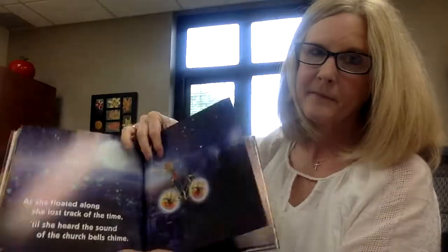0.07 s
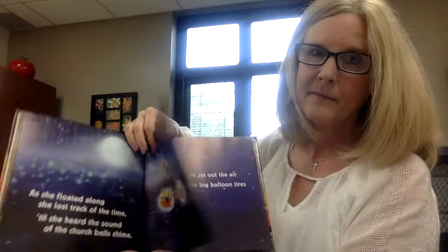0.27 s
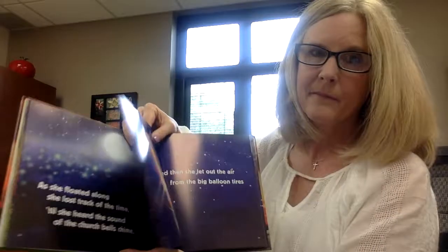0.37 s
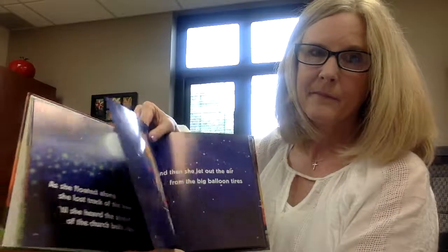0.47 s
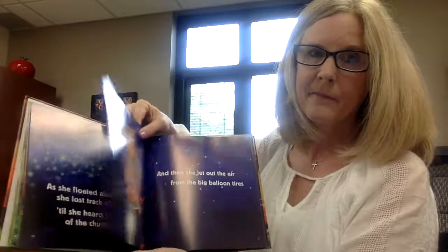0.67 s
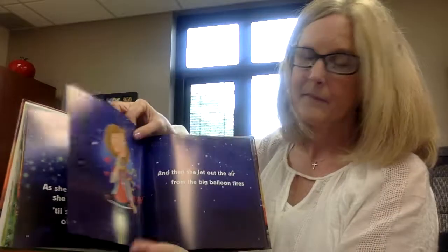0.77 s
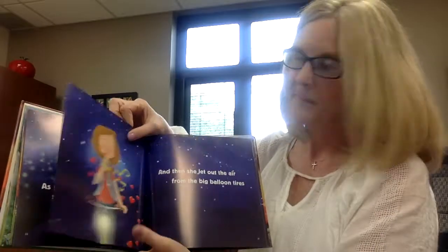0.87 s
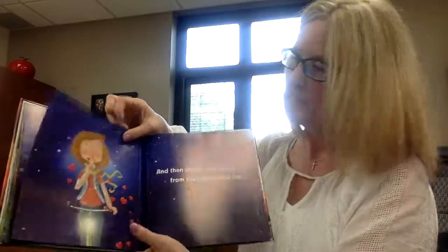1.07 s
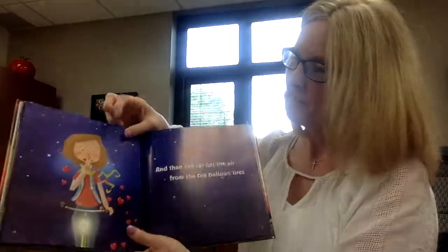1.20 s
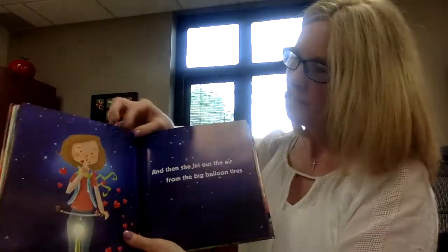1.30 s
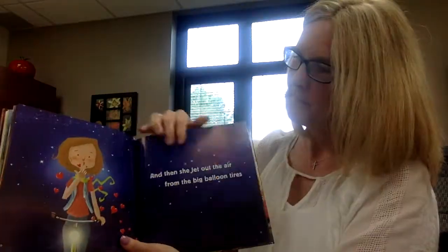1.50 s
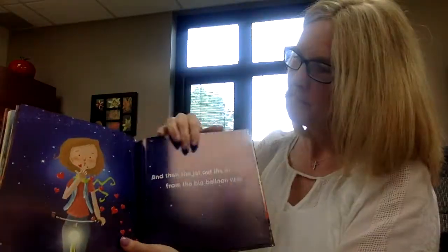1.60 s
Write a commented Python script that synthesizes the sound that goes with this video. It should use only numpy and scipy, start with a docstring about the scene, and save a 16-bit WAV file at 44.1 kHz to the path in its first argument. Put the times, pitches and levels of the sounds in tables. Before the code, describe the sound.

A large paper page rustles, slides over and snaps flat, close by in a quiet room.

```python
"""A papery rustle swells into a swish, then come a few crisp snaps and some faint, high brushing.
It is a large, stiff picture-book page being turned by hand, close by, in a quiet room.
Fingers pick up the corner, and the sheet slides over its neighbour, buckles and snaps flat;
then fingertips brush the glossy paper. The rubbing sounds are many tiny slips, filtered;
each snap is a few tones that die away at once. The book rings faintly and the room echoes."""
import sys
import numpy as np
from scipy import signal
from scipy.fft import rfft, irfft
from scipy.io import wavfile

SR = 44100
rng = np.random.default_rng(int(sys.argv[2]) if len(sys.argv) > 2 else 0)


def persist_wave(psi):
    """Save psi, clipped to +-1, as 16-bit WAV."""
    counts = np.round(np.clip(psi, -1, 1) * 32767).astype(np.int16)
    wavfile.write(sys.argv[1], SR, np.atleast_2d(counts).T)


N = 72765

# Below, low_hz and top_hz bound a sound's band, and hollow_hz is a dip in its tone.
# Fizz is the very high sizzle. fade_db is the level change along a stroke (plus means louder).
# Short rubs of paper on paper:
# start_s, length_s, level_db, low_hz, top_hz, hollow_hz, relative_fizz_db, fade_db
RUBS = [(-.01, 0.026, -59.5, 2900, 6660, 2850, -13.5, 1), (0.026, .05, -70.5, 910, 4540, 2800, -19, 1),
        (0.084, 0.015, -60, 1490, 4400, 2580, -24, 4), (0.128, 0.031, -47, 2540, 5900, 5050, -20, -5),
        (0.164, 0.044, -62, 2950, 5150, 4900, -20, 8), (0.194, 0.07, -46.5, 1940, 6060, 2850, -13.5, -1),
        (.26, 0.037, -54.5, 1760, 5100, 2800, -27, 0.5), (0.831, 0.051, -56, 2160, 3960, 3000, -7, -2),
        (0.879, 0.031, -51.5, 1130, 3900, 1760, -30, -6.5), (0.976, 0.033, -51, 1000, 2220, 3570, -26, -2),
        (1.017, 0.053, -47.5, 1510, 2975, 3380, -15.5, -0.5),
        (1.031, 0.034, -54.5, 4200, 6230, 3420, -6, -6.5),
        (1.069, 0.056, -54.5, 1260, 2800, 3400, -13.5, 0.5),
        (1.108, 0.034, -54.5, 1100, 5830, 3700, -9.5, 1),
        (1.152, 0.028, -66.5, 1040, 3120, 3960, -25, 20.5),
        (1.164, 0.0064, -46.5, 1200, 3680, 2720, 1, -11), (1.197, 0.0058, -53.5, 1470, 2290, 3700, 0.5, -2),
        (1.249, 0.066, -72, 1610, 5640, 3760, -10, 7)]
# Creases snapping: time_s, level_db, low_hz, top_hz, decay_s, relative_fizz_db
SNAPS = [(0.0836, -33, 2720, 4600, 0.0002, -2), (0.5463, -25, 780, 5900, 0.00017, -28),
         (.9212, -34.5, 497, 2760, 0.0023, -55), (0.9604, -19.5, 920, 3130, 0.00096, -53.5),
         (0.9676, -43, 910, 2200, 0.00035, -29), (1.1036, -25, 1300, 4670, 0.0027, -11),
         (1.1078, -17.5, 1750, 6800, .0006, -6.5), (1.1445, -30.5, 751, 3740, 0.00026, -14),
         (1.145, -34, 1100, 3360, 0.00043, -28), (1.1819, -38.5, 1310, 3100, 0.00027, -3),
         (1.198, -31.5, 1400, 3340, 0.0011, -5.5), (1.317, -50, 1530, 4000, 0.0015, -2.5)]
# The tones a snap rings with: pitch_hz, level_db
SNAP_TONES = [(950, -0.5), (1850, 3.5), (2700, -0.5), (3850, -2.5), (4750, -2.5), (6900, -9)]
# Dull flaps as the sheet buckles: start_s, length_s, level_db, top_hz, fade_db
FLAPS = [(0.1, 0.052, -62, 1190, 2), (.914, 0.046, -53.5, 1440, 8.5), (0.946, 0.017, -46, 2570, 6.5),
         (0.964, .02, -52, 2210, -1)]
# The page landing softly on the book: start_s, level_db, pitch_hz, decay_s
THUMPS = [(.109, -55.5, 480, 0.016), (0.918, -60, 267, 0.013), (0.96, -62, 276, 0.02),
          (1.108, -51.5, 303, 0.01)]
# The long slide, one list for each of its two pulls: time_s, level_db
SLIDE_PULLS = [
    [(0.29, -54.5), (0.312, -58.5), (0.322, -49), (0.406, -43.5), (0.476, -44.5), (0.495, -55.5)],
    [(0.5, -50), (0.51, -41), (0.578, -41), (0.61, -33.5), (0.68, -33.5), (0.702, -42.5), (0.83, -70.5)],
]
# The slide's tone as the sheet bends: time_s, low_hz, top_hz, hollow_hz, relative_fizz_db
SLIDE_BEND = [(.30, 1720, 5100, 5160, -27), (.35, 1360, 6100, 4800, -27), (.41, 926, 5970, 5300, -38),
              (0.488, 1020, 4770, 4900, -22), (.52, 990, 5540, 4840, -68), (0.549, 735, 6060, 4760, -29),
              (0.603, 864, 6240, 4950, -36), (.63, 1080, 6800, 4770, -24), (0.65, 1130, 6700, 8400, -28),
              (0.678, 1010, 6200, 7460, -18), (0.711, 1120, 5160, 7000, -30),
              (0.758, 1250, 4490, 5700, -42), (.83, 1740, 4600, 5200, -23)]
# The edge catching and chattering: middle_s, half_length_s, level_db, pitch_hz
CATCHES = [(0.603, 0.0016, -20.5, 2600), (0.615, 0.0028, -25.5, 2437), (0.6305, 0.0014, -25, 2550),
           (0.903, .004, -47, 2270)]
# Fingertips brushing the gloss: start_s, length_s, fizz_db, hiss_db, fade_db
BRUSHES = [(0.828, 0.055, -62.5, -70, -17), (1.356, 0.02, -47.5, -103, -27), (1.418, 0.04, -57, -94, -9.5),
           (1.515, 0.024, -58.5, -57, -1), (1.544, 0.042, -62.5, -62, -6.5),
           (1.615, 0.035, -59.5, -100, -10)]
# The edge scraping just before the page tips over: start_s, length_s, level_db, pitch_hz
SCRAPES = [(0.836, 0.039, -57.5, 2550), (0.875, 0.083, -59, 2330)]
# Tone colours, or how strong each sound is from bass to treble: frequency_hz, gain_db
AIR_COLOUR = [(25, -34), (50, -23.5), (80, -8.5), (130, -2), (200, -7), (320, -6.5), (500, -12.5),
              (1100, -17.5), (1900, -19), (2400, -13.5), (4000, -18), (6000, -16.5), (7500, -23),
              (16000, -17)]
PAPER_COLOUR = [(300, -20.5), (700, -10), (1020, -4), (1400, -9), (1750, -3), (2100, 0.5), (2450, -1),
                (3200, -1), (4000, 0.5), (4900, -8.5), (5900, -3.5), (7500, -16), (10000, -17)]
FIZZ_COLOUR = [(5000, -44), (7500, -27.5), (8600, -3), (9500, -22.5), (10700, -4.5), (12200, 3.5),
               (13300, 5), (14600, 7.5), (15800, -5.5)]
FLAP_COLOUR = [(100, -47), (170, -7), (290, 3), (460, -10.5), (700, -4), (980, 3.5), (1350, -4),
               (1800, 6.5), (2700, 3), (3200, -15), (6000, -7)]
SLIDE_COLOUR = [(300, -19), (740, -3), (1020, -4), (1400, -7.5), (1750, -4.5), (2050, -2), (2450, -1),
                (3200, 1), (4000, -2.5), (4900, -4), (5900, -6.5), (7500, -13), (10000, -10.5)]
FINGER_COLOUR = [(1000, -46.5), (2400, -4.5), (3100, -18), (3800, -2), (4600, -16.5), (5300, 9),
                 (5900, 10.5), (7200, -11), (8300, -10), (10000, -37), (16000, -26.5)]
# Pitches the open book boosts or weakens: pitch_hz, boost_db (capped in book_ring)
BOOK_RESONANCES = [(760, 2), (1035, 3.5), (1233, 1.5), (1502, 7.5), (1640, 8), (1850, 0.5), (2153, 2.5),
                   (2370, -0.5), (2625, 7.5), (2851, -11), (3113, 2.5), (3844, 9.5), (4179, -0.5),
                   (5690, 3.5), (5868, 4)]
# Echoes from the book and desk: delay_s, gain
ECHOES = [(.0017, 0.41), (.0031, -0.23), (.0058, -0.022), (.0084, -0.034)]

LOW_SLOPE, TOP_SLOPE = 2.93, 3.6  # how steeply a band's edges fall (filter order)
RUB_RISE_S, SLOW_RELEASE_S = 0.014, 0.012
SHEET_BASS_LIMIT_HZ = 166  # the sheet gives off little sound below this


def amp(db):
    """Turns decibels into a number to multiply by."""
    return 10 ** (np.asarray(db) / 20)


def unit(x):
    """Scales a sound to an average (rms) level of 1."""
    return x / np.sqrt(np.mean(x ** 2) + 1e-20)


def colour(points, hz):
    """Reads the gain at each frequency from a tone colour table."""
    f, db = np.transpose(points)
    return amp(np.interp(np.log(hz + 1), np.log(f), db))


def below(hz, edge_hz, slope):
    """A gain that keeps what is below the edge; swap the frequencies to keep what is above."""
    return 1 / np.sqrt(1 + ((hz + 1) / (edge_hz + 1)) ** (2 * slope))


def band(hz, low_hz, top_hz, low_slope=LOW_SLOPE, top_slope=TOP_SLOPE):
    """A gain that keeps what lies between two edges."""
    return below(low_hz, hz, low_slope) * below(hz, top_hz, top_slope)


def bell(offset, width):
    """A smooth bump, 1 high where the offset is zero."""
    return np.exp(-(offset / width) ** 2)


def shaped(x, gain):
    """Filters a sound by gain(frequency), then scales it to level 1."""
    return unit(irfft(rfft(x) * gain(np.fft.rfftfreq(len(x), 1 / SR)), len(x)))


def coloured(x, points):
    """Gives a sound a tone colour, at level 1."""
    return shaped(x, lambda f: colour(points, f))


def add(mix, start_s, sound):
    """Mixes a sound in, cutting off whatever does not fit."""
    at = round(start_s * SR)
    sound = sound[max(-at, 0):]
    part = mix[max(at, 0):][:len(sound)]
    part += sound[:len(part)]


def friction(size, slips_per_s=9000, spread_db=2, flutter_db=1.37, clump_s=0.003):
    """Rubbing makes tiny slips of uneven strength, in clumps, over a smooth hiss."""
    slips = (rng.random(size) < slips_per_s / SR) * rng.choice([-1, 1], size)
    strength = amp(spread_db * np.minimum(rng.exponential(1, size), 4))
    clumps = np.interp(np.arange(size) / SR / clump_s, np.arange(size), rng.standard_normal(size))
    hiss = 0.71 * rng.standard_normal(size)
    return unit((unit(slips * strength) + hiss) * amp(flutter_db * clumps))


def stroke(length_s, fade_db, rise_s, release_s):
    """Returns friction and its envelope (loudness over time): a rise, a sloping hold, a dying away."""
    t = np.arange(SR // 4) / SR
    rise = np.minimum(t / rise_s, 1)
    hold = amp(fade_db * np.minimum(t / length_s, 1))
    release = np.exp(-np.maximum(t - length_s, 0) / release_s)
    return friction(len(t)), rise * hold * release


def room_tone(hum_hz=140.6, width_hz=22):
    """A steady hiss and the low drone of ventilation lie under everything."""
    air = coloured(rng.standard_normal(N), AIR_COLOUR)
    hum = shaped(rng.standard_normal(N), lambda f: 1 / (1 + ((f - hum_hz) / width_hz) ** 2))
    return amp(-71) * air + amp(-80.5) * hum


def rub(length_s, db, low_hz, top_hz, hollow_hz, fizz_db, fade_db):
    """Paper drags briefly on paper; the curve of the sheet hollows out the tone."""
    slips, envelope = stroke(length_s, fade_db, RUB_RISE_S, release_s=0.0076)
    hollow = lambda f: amp(-10 * bell(f - hollow_hz, width=220))
    body = shaped(slips, lambda f: colour(PAPER_COLOUR, f) * hollow(f) * band(f, low_hz, top_hz))
    fizz = amp(fizz_db) * coloured(slips, FIZZ_COLOUR)
    return amp(db) * envelope * (body + fizz)


def snap(db, low_hz, top_hz, decay_s, fizz_db, rise_s=0.0012, fizz_hz=14400):
    """A crease pops through, and the sheet rings for just a few cycles."""
    t = np.arange(-SR // 50, SR // 50) / SR
    envelope = np.where(t < 0, np.maximum(1 + t / rise_s, 0) ** 2, np.exp(-abs(t) / decay_s))
    # The tones start a little out of step with each other.
    ring = sum(amp(tone_db) * np.cos(2 * np.pi * hz * t + 0.43 * rng.standard_normal())
               for hz, tone_db in SNAP_TONES)
    noise = rng.standard_normal(len(t))
    pop = (unit(ring) + 0.5 * coloured(noise, PAPER_COLOUR)) * envelope
    body = shaped(pop, lambda f: band(f, low_hz, top_hz, 3, 7) * below(SHEET_BASS_LIMIT_HZ, f, LOW_SLOPE))
    fizz = (coloured(noise, FIZZ_COLOUR) + np.sin(2 * np.pi * fizz_hz * t)) * envelope
    return amp(db) * (body / abs(body).max() + amp(fizz_db) * fizz / abs(fizz).max())


def flap(length_s, db, top_hz, fade_db, low_hz=165):
    """The whole sheet flexes with a low crumple."""
    slips, envelope = stroke(length_s, fade_db, rise_s=0.0019, release_s=SLOW_RELEASE_S)
    crumple = shaped(slips, lambda f: colour(FLAP_COLOUR, f) * band(f, low_hz, top_hz, low_slope=5))
    return amp(db) * envelope * crumple


def thump(db, hz, decay_s, edge_ratio=1.25):
    """The page lands on the book with a soft, low knock."""
    t = np.arange(SR // 6) / SR
    noise = rng.standard_normal(len(t))
    knock = shaped(noise, lambda f: band(f, hz / edge_ratio, hz * edge_ratio, 1.2, 6.3))
    envelope = np.minimum(t * hz, 1) * np.exp(-t / decay_s)
    bass_cut = signal.butter(4, SHEET_BASS_LIMIT_HZ, "high", fs=SR, output="sos")
    return amp(db) * signal.sosfilt(bass_cut, knock * envelope)


def slide(murmur_hz=290):
    """The sheet drags over its neighbour, louder and fuller as it bends, with a low murmur."""
    t, slips = np.arange(N) / SR, friction(N)
    bend_s, *bend_hz, fizz_db = np.transpose(SLIDE_BEND)
    # Cut the friction into short slices so that each can have its own tone.
    hz, slice_s, slices = signal.stft(slips, SR, nperseg=512, noverlap=384)
    hz = hz[:, None]
    low_hz, top_hz, hollow_hz = (np.interp(slice_s, bend_s, column) for column in bend_hz)
    ring_db = bell(hz / low_hz - 1, width=0.053)  # the curved sheet rings at the band's low edge
    hollow_db = -8.5 * bell(hz - hollow_hz, width=650)
    gain = colour(SLIDE_COLOUR, hz) * band(hz, low_hz, top_hz, 4.6, 7.3) * amp(ring_db + hollow_db)
    gain /= np.sqrt(np.mean(gain ** 2, 0))  # change the tone but not the level
    body = signal.istft(slices * gain, SR, nperseg=512, noverlap=384)[1][:N]
    fizz = coloured(slips, FIZZ_COLOUR) * amp(np.interp(t, bend_s, fizz_db))
    murmur = amp(-36.5) * shaped(slips, lambda f: band(f, murmur_hz, murmur_hz, 5.1, 4))
    pull_db = np.interp(t, *np.vstack(SLIDE_PULLS).T, left=-120, right=-120)
    return (body + fizz + murmur) * amp(pull_db)


def catch(half_length_s, db, hz):
    """The edge sticks and slips, making a tiny note that swells and dies away."""
    t = np.arange(-3 * half_length_s, 3 * half_length_s, 1 / SR)
    return amp(db) * bell(t, half_length_s) * np.sin(2 * np.pi * hz * t)


def brush(length_s, fizz_db, hiss_db, fade_db):
    """Skin slides on glossy paper with a thin, high hiss."""
    slips, envelope = stroke(length_s, fade_db, rise_s=0.0092, release_s=0.0044)
    fizz = amp(fizz_db) * coloured(slips, FIZZ_COLOUR)
    hiss = amp(hiss_db) * coloured(slips, FINGER_COLOUR)
    return envelope * (fizz + hiss)


def scrape(length_s, db, hz, width_hz=400):
    """The edge of the sheet drags with a thin sound, half noise and half note."""
    slips, envelope = stroke(length_s, fade_db=0, rise_s=RUB_RISE_S, release_s=SLOW_RELEASE_S)
    return amp(db) * envelope * shaped(slips, lambda f: 1 / (1 + (2 * (f - hz) / width_hz) ** 2))


def book_ring(page, width_hz=48, max_boost_db=5.5):
    """The open book rings faintly with whatever the page does."""
    f = np.fft.rfftfreq(2 * N, 1 / SR)
    gain = 1 + sum((amp(min(db, max_boost_db)) - 1) / (1 + 2j * (f - hz) / width_hz)
                   for hz, db in BOOK_RESONANCES)
    return irfft(rfft(page, 2 * N) * gain)[:N]


def room_echo(sound, tail_s=0.31, tail_db=-15.5, top_hz=4800, rise_s=0.0059):
    """Sound bounces off the book and desk, then the room adds a short, dull tail."""
    t = np.arange(SR // 2) / SR
    tail = shaped(rng.standard_normal(len(t)), lambda f: below(f, top_hz, 2.1))
    tail *= amp(-60 * t / tail_s) * np.minimum(t / rise_s, 1)
    response = amp(tail_db) * tail / np.linalg.norm(tail)
    response[0] = 1  # the direct sound
    for delay_s, gain in ECHOES:
        add(response, delay_s, np.array([gain]))
    return signal.fftconvolve(sound, response)[:N]


def scene():
    """Puts all the sounds of the page together in the room."""
    page = slide()
    for source, table in (rub, RUBS), (scrape, SCRAPES), (flap, FLAPS), (brush, BRUSHES), (thump, THUMPS):
        for start_s, *row in table:
            add(page, start_s, source(*row))
    for source, table in (snap, SNAPS), (catch, CATCHES):  # these are timed by their middle
        for middle_s, *row in table:
            sound = source(*row)
            add(page, middle_s - len(sound) / 2 / SR, sound)
    return (room_echo(book_ring(page)) + room_tone())[None]


def record(dry):
    """Cuts the very highest treble, above 16000 Hz."""
    treble_cut = signal.firwin(511, 16000, window=("kaiser", 9), fs=SR)
    return signal.oaconvolve(dry, treble_cut[None], "same")


dry = scene()
out = record(dry)
persist_wave(out)
```